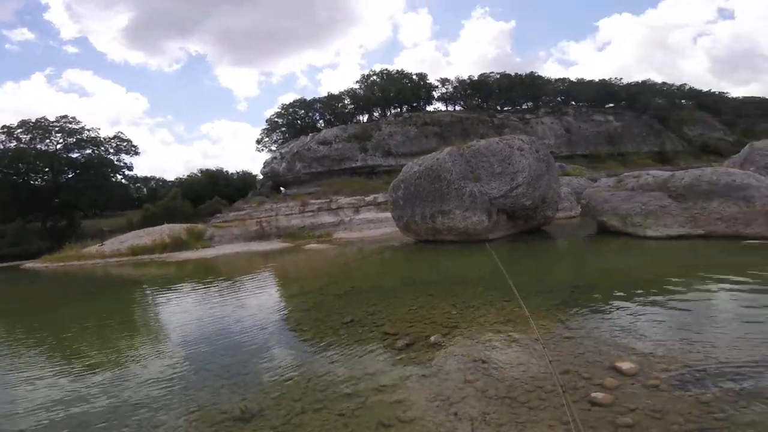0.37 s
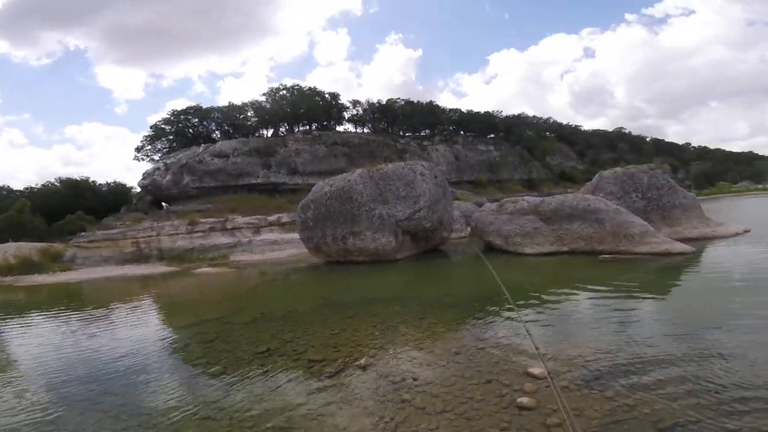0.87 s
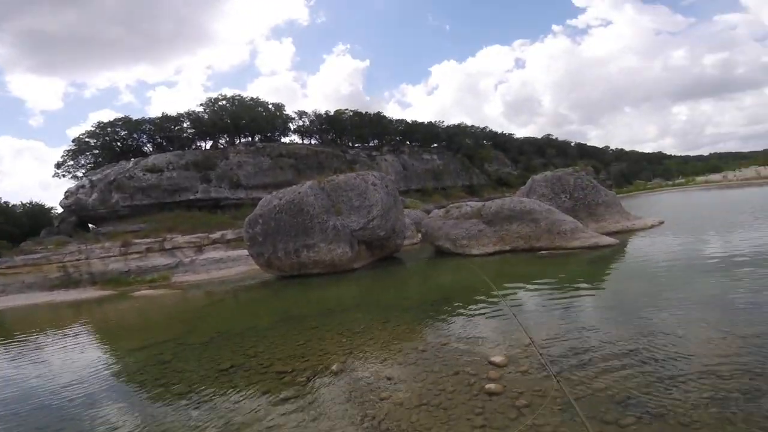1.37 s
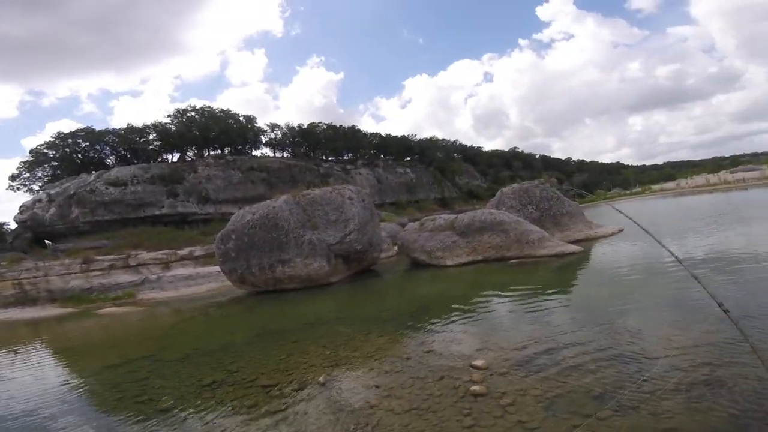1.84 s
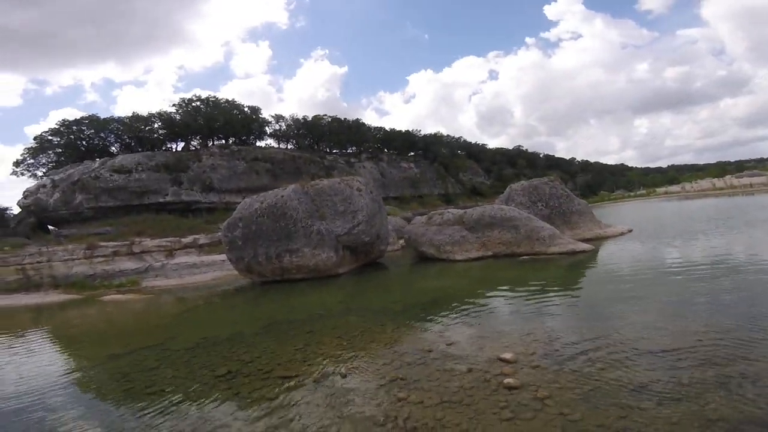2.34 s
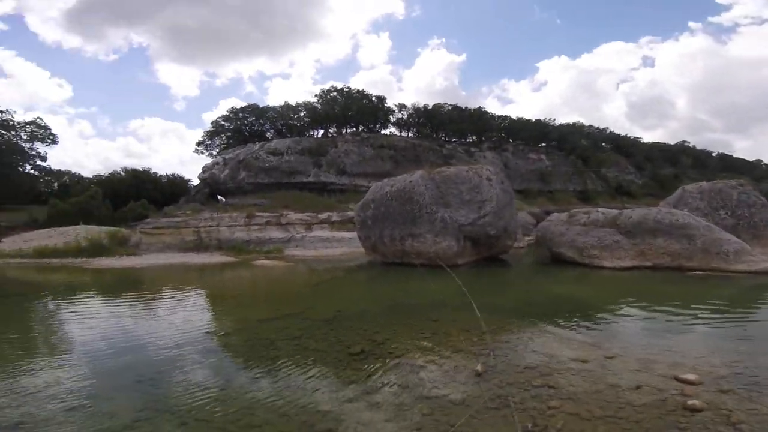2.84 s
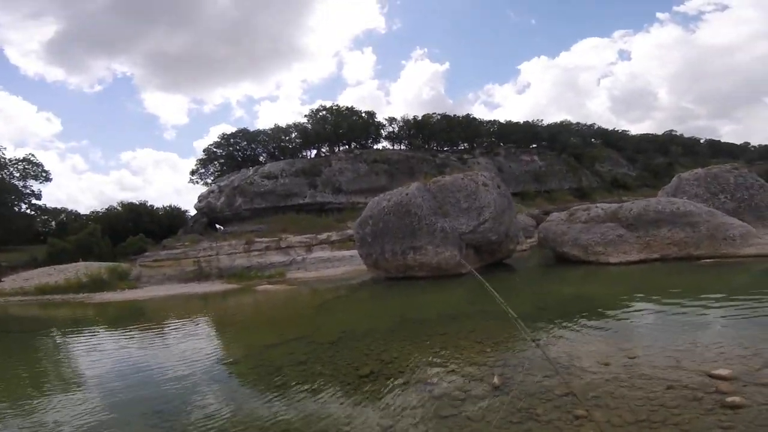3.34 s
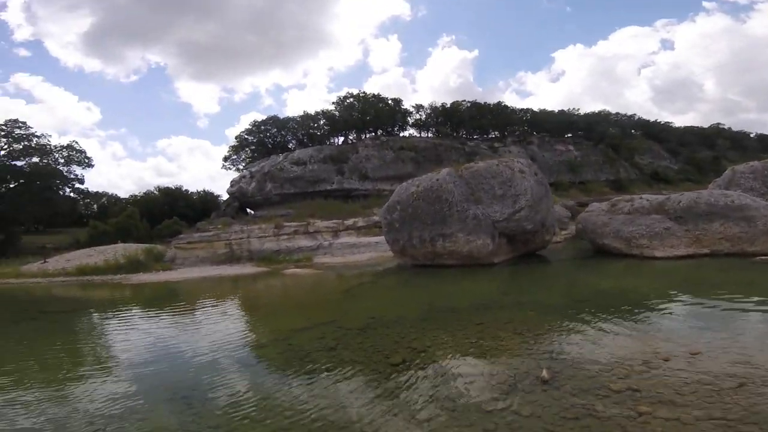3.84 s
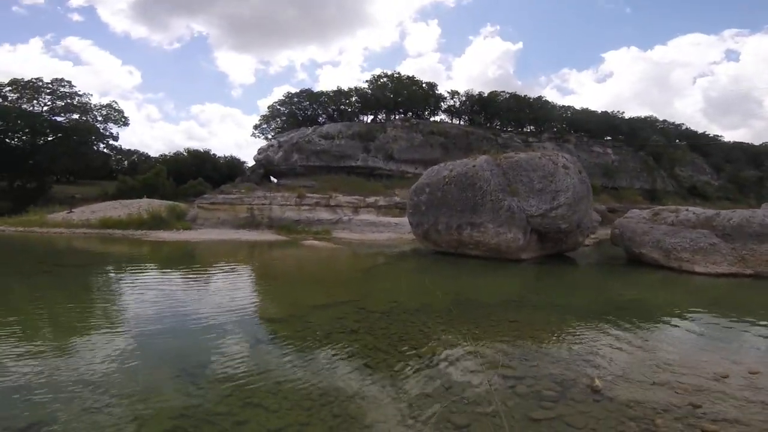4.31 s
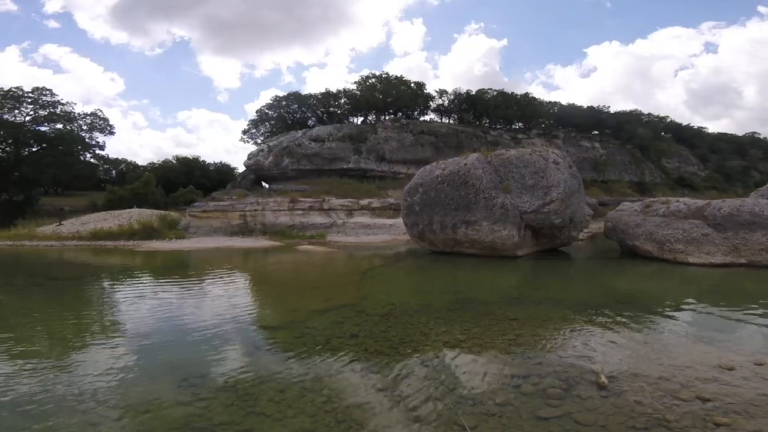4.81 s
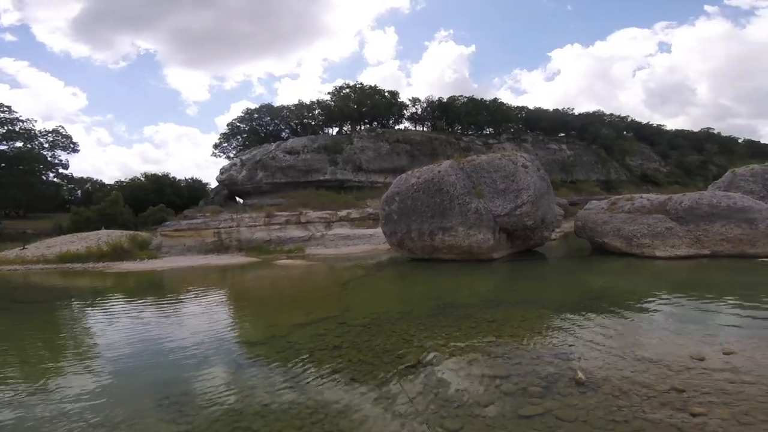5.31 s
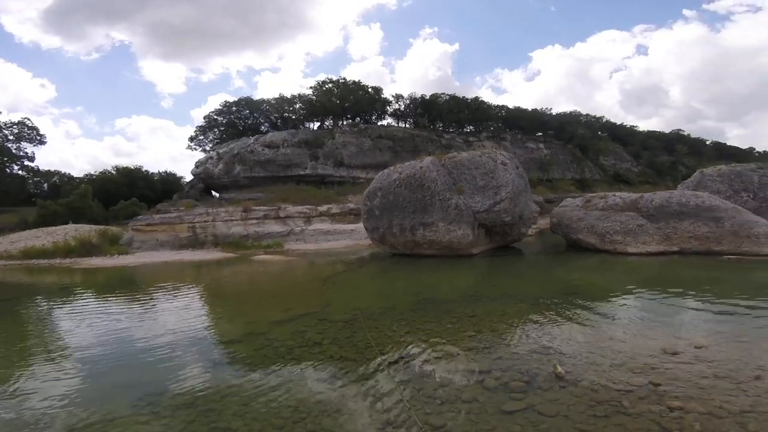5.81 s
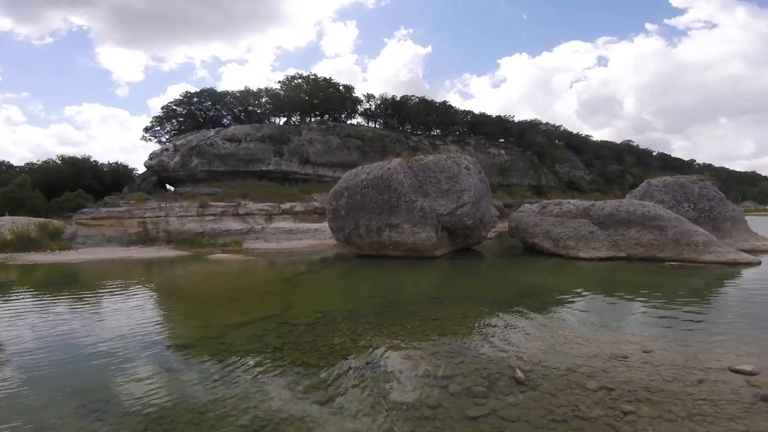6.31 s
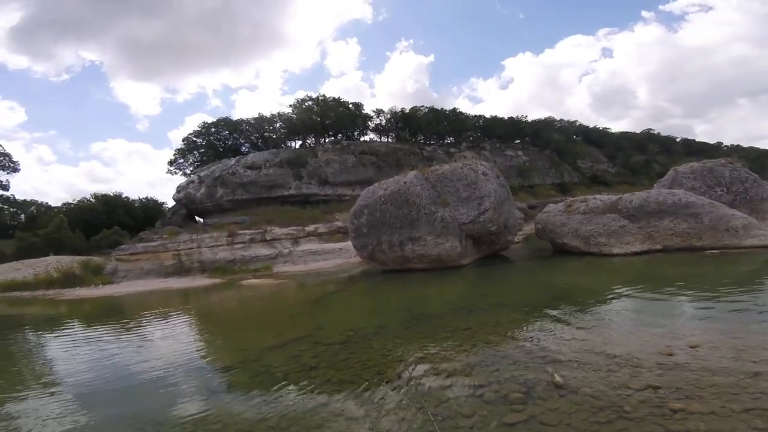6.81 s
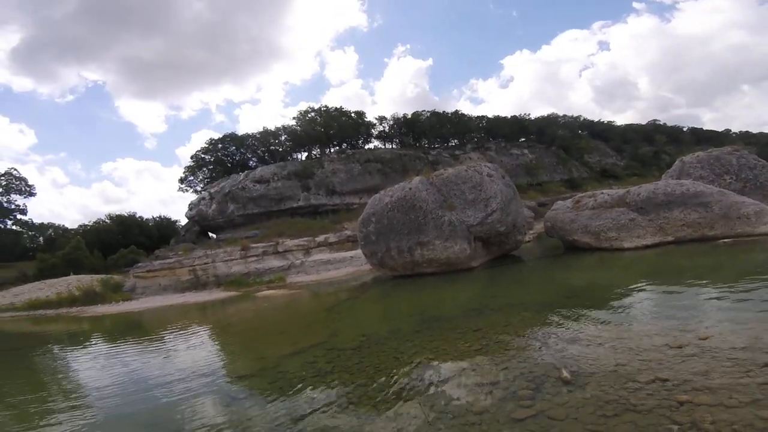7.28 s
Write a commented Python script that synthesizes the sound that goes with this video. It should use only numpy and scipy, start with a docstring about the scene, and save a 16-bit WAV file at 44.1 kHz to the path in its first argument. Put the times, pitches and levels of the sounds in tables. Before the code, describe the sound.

Close, wind-struck outdoor sound: dull thuds and rapid low flutter over irregular sloshes of river water. Early pushes are busy and bubbly, thin out around two seconds, then surge again between three and four. A thin rod swish, faint cloth rubs and tiny ticks pass by. A crisp drop cluster follows, then quiet lapping, muffled gusts and steady soft hiss until the end.

```python
"""Gusts buffet a chest-worn microphone as someone wades through a shallow river on a breezy day.
Wind is low noise, trains of pressure peaks and single thumps; the legs push up noise-washed bubbles
that gurgle and fizz, with single pops and drop ticks; a rod tip and other faint whistles are rough
gliding tones, sleeves are swells of bright noise, and a steady hiss is coloured noise."""
import sys
import numpy as np
from scipy import signal
from scipy.fft import rfft, irfft, next_fast_len
from scipy.io import wavfile
from scipy.ndimage import uniform_filter1d

SR = 44100
rng = np.random.default_rng(int(sys.argv[2]) if len(sys.argv) > 2 else 0)


def output_pcm(signal):
    """Save a mono or channel-first signal as 16-bit PCM at the path in sys.argv[1].

    Samples are clipped to [-1, 1] before scaling.
    """
    pcm = np.clip(np.atleast_2d(signal).T, -1, 1) * 32767
    wavfile.write(sys.argv[1], SR, np.round(pcm).astype(np.int16))


def convert_level_to_amplitude(level_db):
    """Map a level in decibels to its linear amplitude factor."""
    exponent = np.asarray(level_db, float) / 20
    return 10 ** exponent


N = 337806

# Levels in all tables are those ahead of the microphone port.


def rms_one(x):
    """Scales to unit power."""
    return x / np.sqrt(np.mean(x ** 2) + 1e-20)


def drift(corner_hz):
    """Slow chance: noise through a double one-pole low-pass at SR / 20, spread 1."""
    r = np.exp(-2 * np.pi * corner_hz * 20 / SR)
    noise = rng.standard_normal(N // 20 + 4002)
    slow = signal.lfilter([1], [1, -2 * r, r * r], noise)[4000:]  # settled part
    return np.interp(np.arange(N) / 20, np.arange(len(slow)), rms_one(slow))


def band(x, low_hz, high_hz, order=2):
    """Butterworth band-pass."""
    return signal.sosfilt(signal.butter(order, [low_hz, high_hz], "band", fs=SR, output="sos"), x)


def evened(x, window_s):
    """Takes out the swells of a noise that are slower than the window; rms 1."""
    size = int(window_s * SR)
    power = uniform_filter1d(uniform_filter1d(x ** 2, size), size)
    return rms_one(x / np.sqrt(power + 1e-12))


def coloured(points):
    """Noise with the given spectrum, interpolated over log frequency; rms 1."""
    size = next_fast_len(N)
    hz, db = np.transpose(points)
    bin_hz = np.fft.rfftfreq(size, 1 / SR)
    shape = convert_level_to_amplitude(np.interp(np.log(bin_hz + 1), np.log(hz), db))
    return rms_one(irfft(rfft(rng.standard_normal(size)) * shape, size)[:N])


def add(out, start_s, sound):
    """Mixes a short sound in at its start time."""
    at = round(start_s * SR)
    out[at:at + len(sound)] += sound[:N - at]


def wind():
    """Eddies strike the port: slow ones blur to rumble, small ones pass as separate pressure peaks."""
    # hardest single eddies: centre_s, level_db, width_ms
    thumps = [(0.337, -20, 6.9), (0.889, -11.5, 5.3), (0.926, -13, 4.5), (1.012, -4.5, 3.7),
              (1.106, 0, 2.57), (1.377, -8, 5.4), (1.508, -19, 2.7), (1.784, -13.5, 5.8),
              (1.995, -12.5, 4.8), (2.094, -20, 2.9), (2.103, -19, 3.4), (2.133, -18, 2.45),
              (2.355, -19.5, 1.85), (2.528, -10.5, 3.3), (2.558, -15, 3.1), (2.57, -22.5, 2.05),
              (3.204, -5.5, 7.1), (3.428, 1, 2.8), (3.508, -32, 3.5), (4.012, -38, 4.7), (4.077, -15, 5.8),
              (4.648, -29, 15), (4.853, -18, 6.4), (5.015, -18.5, 2.4), (5.459, -16.5, 6.2),
              (5.873, -29, 6.6), (6.096, -22, 6.5), (6.169, -18.5, 7.3), (6.325, -23, 4.5)]
    rumble_db, flutter_db, eddy_db = gusts()
    white = rng.standard_normal((2, N))
    rumble = evened(band(white[0], 18.2, 67.2, order=3), window_s=0.1)

    peaks_per_s = 70
    passing = (rng.random(N) < peaks_per_s / SR) * rng.uniform(0.17, 1, N)
    train = signal.oaconvolve(passing, eddy(width_ms=5.55))[:N]
    peaks = evened(band(train, 85.9, 171), window_s=0.029)

    # the smallest eddies ride on the peaks
    small = band(white[1], 133.6, 263.6, order=3)
    small = rms_one(small * convert_level_to_amplitude(2.5 * drift(25) + 3.5 * peaks))

    push = convert_level_to_amplitude(rumble_db) * (rumble + convert_level_to_amplitude(flutter_db) * peaks + convert_level_to_amplitude(eddy_db) * small)
    for centre_s, level_db, width_ms in thumps:
        add(push, centre_s - 0.02, convert_level_to_amplitude(level_db) * eddy(width_ms))
    return push


def gusts():
    """Rumble level with its lumps and buffets; flutter and small eddies relative to it, in dB."""
    # gust curve: time_s, rumble_db, flutter_db (above the rumble)
    gust_points = [(0.0, -35, 0), (0.04, -37.5, -14.5), (0.66, -40.5, -10.5), (1.09, -18, -4),
                   (1.23, -33.5, -7), (1.38, -31.5, -1), (1.71, -37, -22.5), (1.98, -40, 3),
                   (2.11, -22.5, -7), (2.22, -34.5, -2), (2.45, -28, -16.5), (2.56, -30, -6.5),
                   (2.84, -37, -10), (3.11, -32, -15.5), (3.2, -22, -11), (3.35, -39, -4),
                   (3.46, -16, -4.5), (3.75, -36, -15.5), (4.1, -31.5, -16), (4.14, -35.5, -15),
                   (4.5, -37.5, -22), (4.59, -38.5, -0.5), (4.76, -29, -18.5), (4.84, -34, -2.5),
                   (4.97, -30.5, -15), (5.25, -35.5, -30), (6.36, -38, -13), (7.66, -47, -25.5)]
    # short buffets and lulls: centre_s, swell_db, half_length_s, sharpness_db (extra flutter and eddies)
    buffets = [(0.304, 3, 0.049, 5), (0.33, 4.5, .05, 8), (0.93, 9, 0.053, 2), (1.018, 4, 0.017, 8),
               (1.108, 4, 0.048, 3.5), (1.205, 7, 0.053, -17), (1.328, -13, 0.027, 1),
               (1.392, 6.5, 0.045, 3), (1.515, 9.5, 0.062, 10), (1.597, 12.5, 0.022, -5),
               (1.75, 5.5, 0.085, -5), (2.051, -2.5, 0.024, 14), (2.105, 4, .05, -14),
               (2.136, -3, 0.042, 8), (2.359, 7.5, 0.054, 5), (2.525, 7, 0.12, 6), (2.487, -9, 0.024, -2),
               (2.794, -9, 0.049, 1), (3.087, -9.5, 0.065, -4), (3.192, 1, 0.11, -0.5),
               (3.232, -13, 0.026, 7), (3.311, 10, 0.059, -8), (3.414, 0, 0.035, 9), (3.477, 0, .06, -2),
               (3.492, 1.5, 0.039, 8), (3.965, 4, 0.12, 13.5), (4.064, 10, 0.052, -6.5),
               (4.544, 1, 0.048, -15), (4.606, 8, 0.061, 0), (4.653, 3, 0.035, 8),
               (4.685, 13.5, 0.027, -11), (4.754, 10.5, 0.023, -15), (4.853, -1, .05, 7),
               (4.965, 5.5, 0.041, 8), (5.019, 12.5, 0.051, 0), (5.464, 0, 0.045, -16),
               (5.88, 6.5, 0.052, 6), (6.06, 10.5, 0.074, -2), (6.176, 7, 0.096, 10.5),
               (6.321, 18.5, 0.023, -4), (6.394, 14.5, .04, -4), (6.444, 0, 0.03, 7), (6.548, 13, 0.05, 4),
               (6.611, 9.5, 0.055, 4), (6.738, 6.5, 0.093, -18), (6.902, 6.5, .06, -11)]
    time_s, rumble_points_db, flutter_points_db = np.transpose(gust_points)
    t = np.arange(N) / SR
    gust_db = np.interp(t, time_s, rumble_points_db)
    flutter_db = np.interp(t, time_s, flutter_points_db)

    swell_db = 1.78 * drift(8.1)  # lumps
    sharp_db = 0.85 * drift(8.2)
    for centre_s, peak_swell_db, half_length_s, sharpness_db in buffets:
        shape = np.hanning(int(2 * half_length_s * SR))
        add(swell_db, centre_s - half_length_s, peak_swell_db * shape)
        add(sharp_db, centre_s - half_length_s, sharpness_db * shape)
    flutter_db = flutter_db + sharp_db

    # small eddies follow the flutter and grow with gusts above -35 dB
    eddy_db = -16.5 + 0.89 * flutter_db + 0.45 * (gust_db + 35) + 4.2 * drift(11.0)
    return gust_db + swell_db, flutter_db, eddy_db


def eddy(width_ms):
    """A pressure peak between two shallower troughs, centred at 20 ms; it collapses faster than it builds."""
    u = (np.arange(int(0.04 * SR)) / SR - 0.02) * 1000 / width_ms
    peak = np.exp(-np.where(u < 0, 2.5, 4.5) * u ** 2)
    return peak - 0.18 * np.exp(-0.6 * u ** 2)


def water():
    """Large bubbles slosh, small ones fizz, the finest crackle as spray, each on a wash of unresolved ones."""
    slosh_gain, fizz_gain, spray_gain = surges()
    white = rng.standard_normal((3, N))
    slosh_wash = rms_one(band(white[0], 300, 1210))
    fizz_wash = rms_one(band(white[1], 820, 2470))
    spray_wash = rms_one(band(white[2], 2500, 6000, order=1))
    slosh = gurgle(450, 347.8, 1429, 4.74, 3.8, 2.5, tilt_db=5.0) + 0.53 * slosh_wash
    fizz = gurgle(700, 1100, 3000, 5.5, 3.2, 3.5, tilt_db=-3.0) + 0.6 * fizz_wash
    spray = gurgle(900, 2600, 7500, 6.0, 4.0, 3.5, tilt_db=-4.0) + 0.7 * spray_wash
    return slosh_gain * rms_one(slosh) + fizz_gain * rms_one(fizz) + spray_gain * rms_one(spray)


def surges():
    """Gain of slosh, fizz and spray: every leg push rises, holds and drains, over a steady lapping."""
    # pushes of a leg through the water: start_s, length_s, slosh_db, fizz_db, spray_db
    pushes = [(0.0, 0.052, -46, -50, -57), (0.056, 0.026, -58, -49.5, -54.5), (0.106, .1, -44, -58, -61.5),
              (0.262, 0.12, -45, -47.5, -56), (0.662, 0.18, -50.5, -55.5, -62),
              (0.893, 0.091, -44, -51, -59), (1.04, 0.15, -46.5, -56, -59.5),
              (1.536, 0.054, -59.5, -74, -65), (1.722, 0.2, -59.5, -59, -82),
              (2.203, 0.25, -52.5, -57, -64), (2.768, 0.077, -52.5, -56, -59),
              (2.975, .12, -50.5, -57, -58.5), (3.138, .14, -49, -52.5, -61),
              (3.34, 0.027, -44, -55, -58.5), (3.458, 0.12, -41, -49.5, -60.5), (3.62, .15, -45, -56, -60),
              (3.787, 0.17, -42.5, -46.5, -55.5), (3.987, 0.28, -52, -53.5, -52.5),
              (4.308, 0.11, -63, -60, -59.5), (4.524, 0.24, -66.5, -73, -62), (5.72, 0.29, -63.5, -67, -83),
              (6.28, 0.18, -60.5, -65.5, -87), (6.75, 0.62, -70, -83, -73), (7.2, 0.12, -71, -83, -80)]
    # lapping between the surges: slosh_db, fizz_db, spray_db
    lapping_db = (-66.5, -67.5, -71)
    rise_db_per_s, fall_db_per_s = 224, 136
    t = np.arange(N) / SR
    power = convert_level_to_amplitude(np.array(lapping_db))[:, None] ** 2
    for start_s, length_s, *level_db in pushes:
        before_db = rise_db_per_s * (start_s - t)
        after_db = fall_db_per_s * (t - start_s - length_s)
        lost_db = np.maximum(np.maximum(before_db, after_db), 0)
        power = power + np.outer(convert_level_to_amplitude(np.array(level_db)) ** 2, convert_level_to_amplitude(-2 * lost_db))
    return np.sqrt(power)


def gurgle(per_s, low_hz, high_hz, cycles, spread_db, clump_db, tilt_db):
    """Bubbles of 16 sizes are born at random, in clumps; the smallest differ from the largest by the tilt; rms 1."""
    born = rng.random(N) < per_s * convert_level_to_amplitude(clump_db * drift(11)) / SR
    level_db = spread_db * np.minimum(rng.exponential(1, N), 4)
    strikes = born * convert_level_to_amplitude(level_db) * rng.choice([-1, 1], N)
    dealt = rng.integers(0, 16, N)  # size of each bubble
    out = np.zeros(N)
    for k, hz in enumerate(np.geomspace(low_hz, high_hz, 16)):
        ring = bubble(hz, cycles / hz, rise=0.12)
        out += convert_level_to_amplitude(tilt_db * k / 15) * signal.oaconvolve(strikes * (dealt == k), ring)[:N]
    return rms_one(out)


def bubble(pitch_hz, length_s, rise):
    """A pinched-off air pocket rings, dies away and climbs in pitch as it nears the surface; peak near 1."""
    t = np.arange(int(4 * length_s * SR) + 8) / SR
    u = t / length_s
    shape = 1.98 * (1 - np.exp(-11.0 * u)) * np.exp(-1.3 * u)
    shape = shape * (1 - (u / u[-1]) ** 4)  # ends at zero
    return shape * np.sin(2 * np.pi * pitch_hz * t * (1 + rise * (u - 1) / 2))


def pops():
    """The bubbles and drops loud enough to be heard one by one, each a ringing air pocket."""
    # start_s, peak_db, pitch_hz, length_ms (time scale of the decay)
    loud_bubbles = [(0.064, -40, 387, 13), (0.071, -38, 3080, 2.3), (0.083, -35, 610, 6.3),
                    (0.19, -39, 1160, 4.9), (0.218, -34.5, 920, 5), (0.358, -34, 1460, 6.1),
                    (0.361, -30, 910, 2.6), (0.584, -43.5, 1220, 5.9), (0.696, -39, 2620, 2.3),
                    (0.749, -37.5, 940, 9.3), (0.782, -45.5, 600, 26), (0.824, -39, 550, 5.9),
                    (0.872, -36, 1240, 3), (0.913, -33.5, 670, 8.5), (0.948, -35.5, 1170, 5.2),
                    (1.206, -44.5, 750, 13), (1.661, -42, 3200, 2.2), (1.666, -48, 4240, 1.5),
                    (1.705, -50, 2885, 3.6), (1.764, -43.5, 1240, 3.7), (1.78, -43, 2217, 1.3),
                    (1.852, -46.5, 1560, 4), (1.964, -45.5, 3060, 2.1), (2.28, -39.5, 700, 7.1),
                    (2.357, -42, 1390, 3.5), (2.444, -50, 1430, 3.1), (2.754, -41.5, 1380, 6.9),
                    (2.766, -44, 1030, 7.5), (2.909, -48, 985, 7.6), (2.951, -41, 953, 19),
                    (2.954, -35, 527, 4.7), (3.014, -46, 760, 20), (3.162, -33, 945, 3.5),
                    (3.209, -33.5, 890, 10.6), (3.259, -40, 500, 11.5), (3.46, -42, 1130, 5.5),
                    (3.493, -30.5, 610, 16), (3.519, -34, 1040, 15), (3.533, -37.5, 756, 22),
                    (3.558, -35, 1780, 2.3), (3.808, -39.5, 780, 6.1), (3.872, -34.5, 312, 14),
                    (3.921, -28, 456, 5.6), (3.927, -30.5, 744, 8.1), (4.141, -42, 470, 11),
                    (4.178, -37, 2060, 3.3), (4.2, -17, 1730, 2), (4.215, -43, 910, 7.5),
                    (4.269, -36.5, 2270, 1.1), (4.287, -46.5, 980, 15), (4.318, -45.5, 970, 10),
                    (4.524, -43, 3460, 2.9), (4.54, -41, 3350, 2.4), (4.542, -46, 2040, 3.5),
                    (5.618, -46.5, 1350, 6.8), (5.726, -51.5, 820, 11), (6.267, -43.5, 460, 24),
                    (6.31, -53, 920, 9), (6.323, -51, 1730, 7), (6.33, -49, 634, 7.9),
                    (6.632, -37.5, 345, 3.7), (6.835, -49, 947, 2.4), (7.053, -42, 1710, 0.85),
                    (7.135, -51, 2180, 2.4), (7.231, -42, 402, 5.7), (7.248, -34.5, 377, 6.7),
                    (7.339, -40.5, 310, 4.9)]
    out = np.zeros(N)
    for start_s, peak_db, pitch_hz, length_ms in loud_bubbles:
        add(out, start_s, convert_level_to_amplitude(peak_db) * bubble(pitch_hz, length_ms / 1000, rise=0.101))
    return out


def ticks():
    """Drops and tackle tick: noise bursts of about a millisecond, broad around a nominal pitch."""
    # start_s, peak_db, nominal_hz
    strikes = [(0.5545, -39, 6300), (0.6954, -43, 3200), (0.6967, -36, 5600), (1.6586, -42, 3130),
               (1.7215, -41, 6500), (2.3441, -37, 6500), (2.7678, -41.5, 4200), (3.4333, -38, 3320),
               (3.976, -33, 3400), (4.1764, -29, 6480), (4.1884, -33, 3990), (4.1978, -25, 5800),
               (4.2204, -38, 5000), (4.239, -32.5, 6520), (4.5246, -39, 3400), (4.5282, -33, 6200),
               (4.5399, -45, 3180), (4.56, -43, 3900), (5.6164, -64, 6590), (6.1674, -71, 6530),
               (7.0514, -56, 6570)]
    out, t = np.zeros(N), np.arange(200) / SR
    noises = rng.standard_normal((len(strikes), 200))
    for (start_s, peak_db, nominal_hz), noise in zip(strikes, noises):
        noise = noise * np.exp(-t / 0.0012)
        burst = band(noise, nominal_hz * 0.55, min(nominal_hz * 1.22, 8800), order=3)
        add(out, start_s, convert_level_to_amplitude(peak_db) * burst / np.abs(burst).max())
    return out


def whistles():
    """A thin edge sheds eddies at a rate set by its speed: a short rough tone."""
    # faint and breathy, the first from the rod tip whipping past: start_s, from_hz, to_hz, length_s, level_db
    tones = [(2.776, 5760, 2700, 0.028, -46.5), (1.547, 1340, 1346, 0.092, -60),
             (1.669, 1330, 1290, 0.04, -57), (1.85, 1520, 1340, 0.086, -55), (2.03, 832, 866, 0.058, -57),
             (4.633, 1420, 1380, 0.11, -61), (5.533, 1380, 1400, .05, -63), (5.682, 1410, 1350, 0.094, -59),
             (6.227, 378, 470, 0.048, -58), (6.34, 610, 640, 0.07, -61), (6.39, 1315, 1750, .06, -59.5)]
    out = np.zeros(N)
    noises = rng.standard_normal((len(tones), 8000))
    for (start_s, from_hz, to_hz, length_s, level_db), noise in zip(tones, noises):
        size = int(length_s * SR)
        phase = 2 * np.pi * np.cumsum(np.linspace(from_hz, to_hz, size)) / SR
        rough = 1 + 0.3 * rms_one(uniform_filter1d(noise, size=150))[:size]
        fade = signal.windows.tukey(size, 0.7)
        add(out, start_s, convert_level_to_amplitude(level_db) * fade * rough * np.sin(phase))
    return out


def sleeves():
    """Cloth rubs on cloth as the arm casts: soft swells of bright, slightly uneven noise."""
    # strokes: start_s, length_s, level_db
    strokes = [(1.519, 0.088, -54.5), (2.52, 0.25, -61.5), (2.83, 0.18, -52), (4.022, 0.12, -55),
               (4.278, 0.39, -54.5), (5.802, 0.22, -67), (6.695, 0.24, -63.5)]
    # cloth spectrum, relative: frequency_hz, density_db (per Hz)
    cloth_spectrum = [(2800, -6), (4000, 5), (5000, 3), (7000, 2.5), (9000, -10), (11000, -28)]
    gain = np.zeros(N)
    for start_s, length_s, level_db in strokes:
        add(gain, start_s, convert_level_to_amplitude(level_db) * np.sqrt(np.hanning(int(length_s * SR))))
    return gain * coloured(cloth_spectrum) * convert_level_to_amplitude(1.8 * drift(30))


def hiss():
    """The steady floor: stationary coloured noise."""
    # relative spectrum: frequency_hz, density_db (per Hz)
    floor_spectrum = [(120, -21), (200, 1), (644, -9), (859, -6), (1050, -16.5), (1770, -14.5), (4840, -20),
                      (6570, -10.5), (9080, -15), (10300, -26.5), (11500, -22.5), (12800, -23.5),
                      (14800, -38)]
    return convert_level_to_amplitude(-58) * coloured(floor_spectrum)


def scene():
    """Wind, water, tackle, sleeves and the steady floor, in one channel."""
    mix = wind() + water() + pops() + ticks() + whistles() + sleeves() + hiss()
    return mix[None]


def roll_off(x):
    """The treble ends steeply here."""
    return signal.sosfilt(signal.butter(12, 14910, fs=SR, output="sos"), x)


def record(dry):
    """The microphone port rings near its resonance, peaks are rounded, both ends of the spectrum are cut."""
    port_hz, port_width_hz, port_gain = 6520, 400, 0.96
    r = np.exp(-np.pi * port_width_hz / SR)
    zeros = [(1 - r * r) / 2, 0, (r * r - 1) / 2]
    poles = [1, -2 * r * np.cos(2 * np.pi * port_hz / SR), r * r]
    ringing = signal.lfilter(zeros, poles, dry)
    rounded = 0.41 * np.tanh((dry + port_gain * ringing) / 0.65)
    low_cut = signal.lfilter([1, -1], [1, -np.exp(-2 * np.pi * 12 / SR)], rounded)  # 12 Hz
    # 60 dB down from 15600 Hz up
    finished = signal.sosfilt(signal.cheby2(12, 60, 15600, fs=SR, output="sos"), low_cut)
    return roll_off(finished)


dry = scene()
out = record(dry)
output_pcm(out)
```